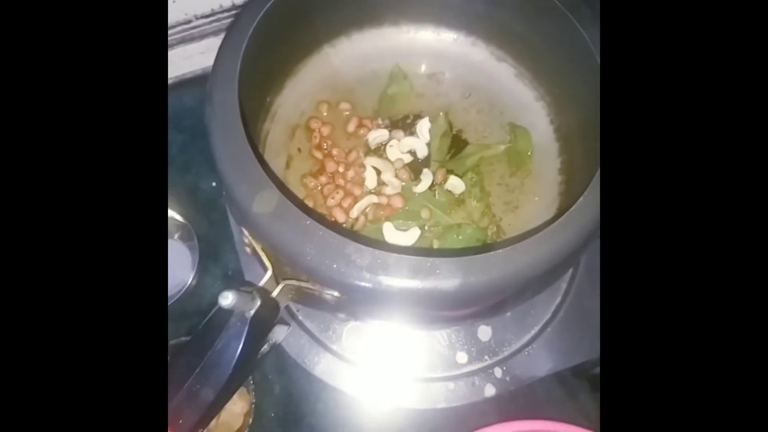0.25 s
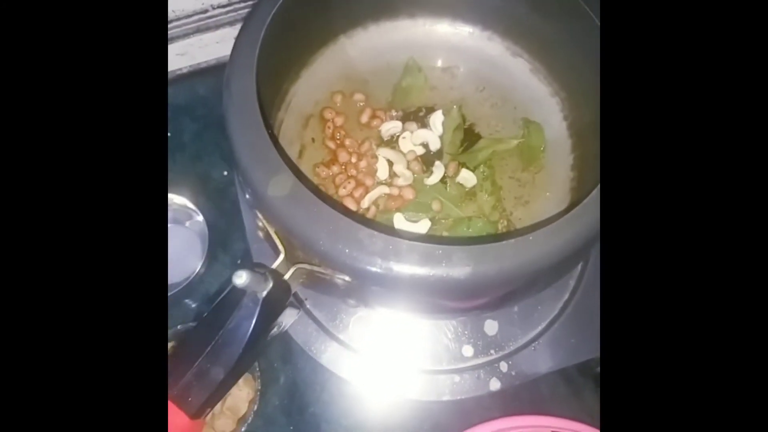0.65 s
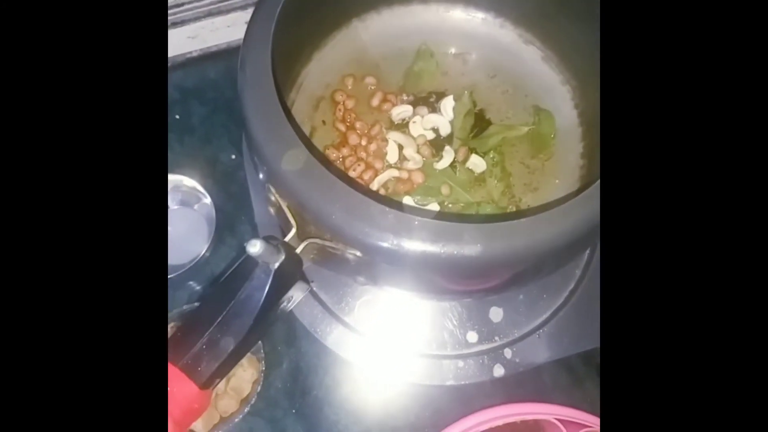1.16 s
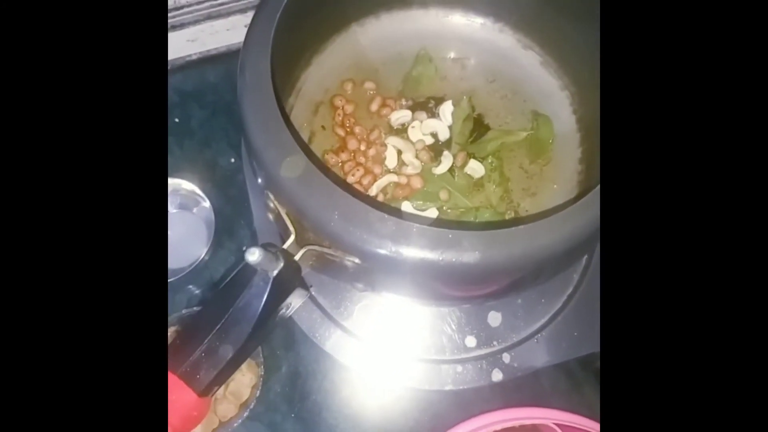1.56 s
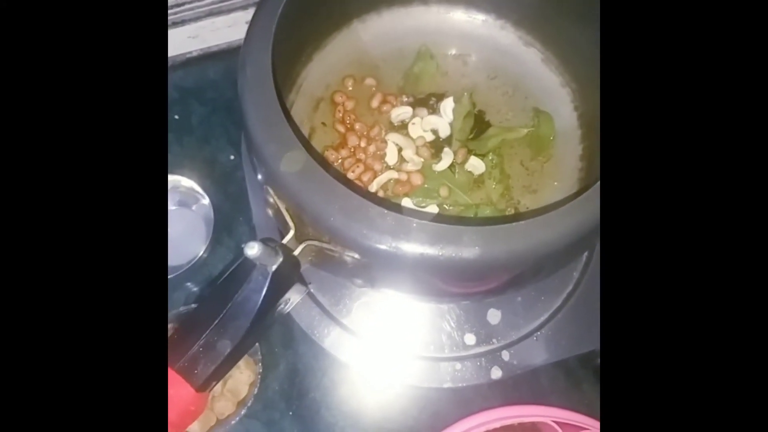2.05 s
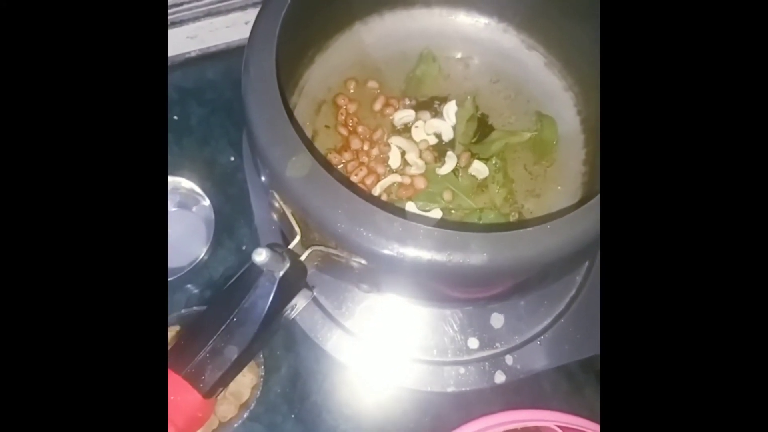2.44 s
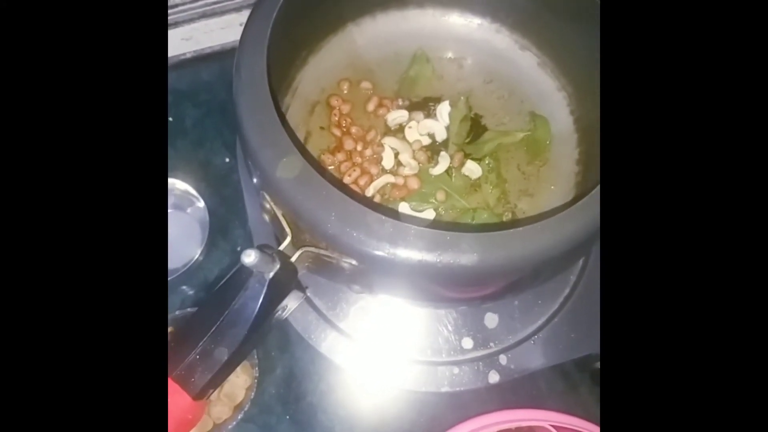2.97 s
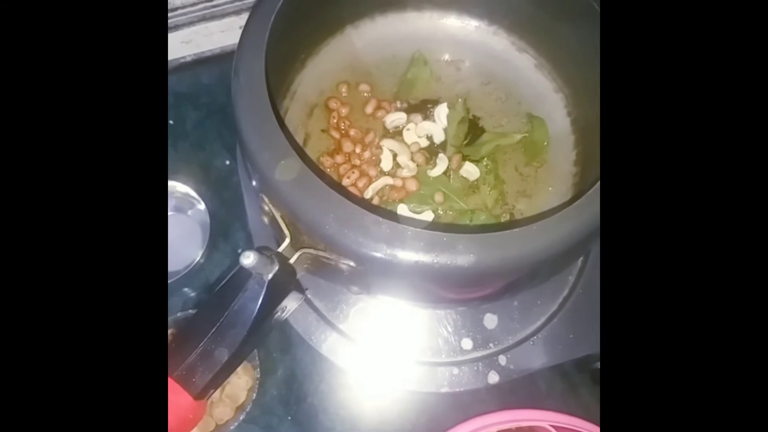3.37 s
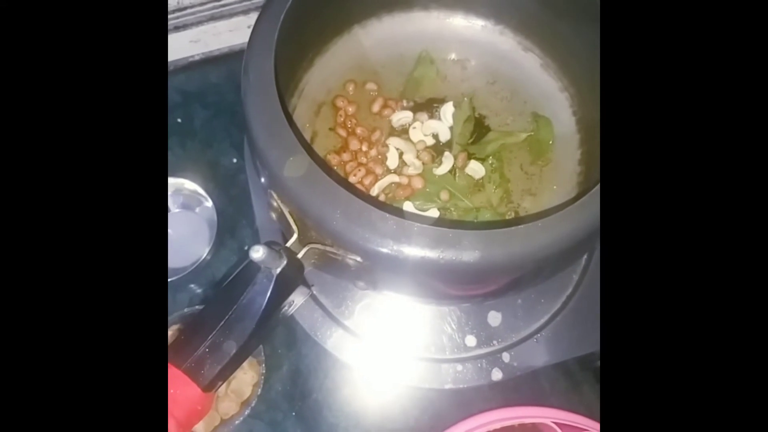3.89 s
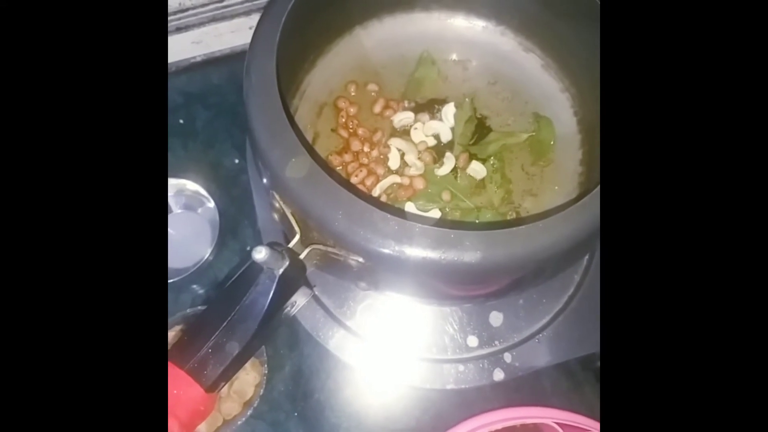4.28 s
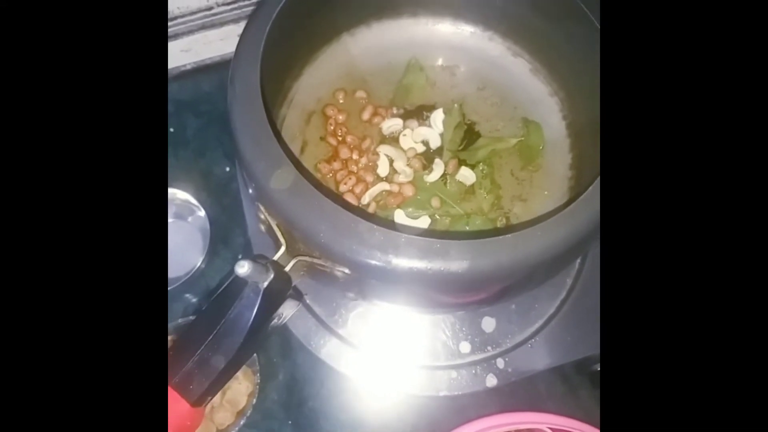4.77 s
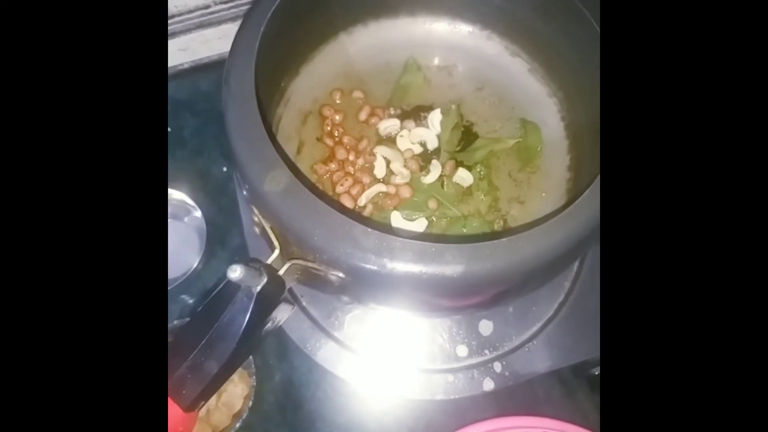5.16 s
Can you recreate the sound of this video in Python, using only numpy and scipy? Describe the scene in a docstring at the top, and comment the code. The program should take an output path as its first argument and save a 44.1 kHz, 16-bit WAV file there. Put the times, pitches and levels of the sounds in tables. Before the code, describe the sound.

A metallic clang, slightly left, opens the scene and is stopped in about 0.4 seconds. Steady, crisp frying hiss follows, with irregular pops, the strongest at roughly 0.8, 1.2, 2.6 and 4.1 seconds, some with short spitting bursts and dull knocks. Later the popping thins out. Close handheld stereo microphone above the pot, hard kitchen walls, very faint low flame underneath.

```python
"""A small hard kitchen: nuts and spices fry gently in an open pressure cooker on a gas stove, from just above the rim.
A steel utensil clangs as beating modes and is stilled by a hand. Dense random clicks, coloured, make the oil hiss;
larger steam bubbles pop as noise cracks with short gliding tones, which echo in the pot and the kitchen.
Coarser clicks spit and noise bands knock; filtered noise and faint tones make the low murmur of the burner."""
import sys
import numpy as np
from scipy import signal
from scipy.fft import rfft, irfft, next_fast_len
from scipy.io import wavfile
from scipy.ndimage import uniform_filter1d

SR = 44100
rng = np.random.default_rng(int(sys.argv[2]) if len(sys.argv) > 2 else 0)


def to_wav(sig):
    """Store sig (one row per channel, or 1-D mono) as 16-bit WAV at the path in sys.argv[1].

    Samples outside -1..1 are clipped; the rate is SR.
    """
    pcm = np.clip(np.atleast_2d(sig), -1, 1) * 32767
    pcm = np.round(pcm).astype(np.int16)
    wavfile.write(sys.argv[1], SR, pcm.T)  # frames by channels


N = 239154
T = np.arange(N) / SR


def undb(db):
    """Decibels to gain."""
    return 10 ** (np.asarray(db) / 20)


def unit(x):
    """Scale to an rms of one."""
    return x / np.sqrt(np.mean(x ** 2) + 1e-30)


def packet(x):
    """Scale to an energy of one."""
    return x / np.sqrt(np.sum(x ** 2) + 1e-30)


def fade(t, t60):
    """Silence before t = 0, then an exponential decay of 60 dB in t60 seconds."""
    return (t >= 0) * np.exp(-np.log(1000) * np.maximum(t, 0) / t60)


def colour(x, points, centre_hz=None, octaves=1):
    """Minimum-phase filter through (Hz, dB) points; optional hump, 6 dB down at +-octaves from its centre."""
    size = next_fast_len(len(x)) * 2
    log_f = np.log2(np.maximum(np.arange(size // 2 + 1) * SR / size, 1))
    hz, db = np.transpose(points)
    gain = undb(np.interp(log_f, np.log2(hz), db))
    if centre_hz:
        gain = gain / (1 + ((log_f - np.log2(centre_hz)) / octaves) ** 2)
    # folding the cepstrum makes the filter causal
    cepstrum = irfft(np.log(gain))
    cepstrum[1:size // 2] *= 2
    cepstrum[size // 2 + 1:] = 0
    response = np.exp(rfft(cepstrum))
    return irfft(rfft(x, size) * response)[:len(x)]


def resonate(x, hz, width_hz):
    """One resonance, gain one at its centre."""
    b, a = signal.iirpeak(min(hz, SR / 2 - 1000), hz / width_hz, fs=SR)
    return signal.lfilter(b, a, x)


def walk(rate_hz):
    """Smooth random wandering, rms one."""
    step = int(SR / rate_hz)
    held = np.repeat(rng.standard_normal(N // step + 1), step)
    return unit(uniform_filter1d(held, step)[:N])


def grains(rate_hz, spread_db):
    """Random tiny clicks of either sign, most weak and a few strong, rms one."""
    sizes = undb(spread_db * np.minimum(rng.exponential(size=N), 2 * np.pi))
    return unit((rng.random(N) < rate_hz / SR) * sizes * rng.choice([-1, 1], N))


def add(out, s, x):
    """Mix x into out from time s."""
    start = max(int(s * SR), 0)
    out[start:start + len(x)] += x[:max(N - start, 0)]


# Louder bursting droplets. Each row: start in seconds, level in dB, bubble pitch in Hz,
# bubble's share of the energy 0-1.
LOUD_POPS = [(.279, -39, 8600, 0), (.385, -35, 8440, 0.3), (0.432, -25.5, 10960, 0.63),
             (0.447, -33, 5740, 0.7), (.6517, -32, 7500, 0), (.75, -29.5, 8600, 0.35),
             (0.827, -31, 11360, 0.8), (0.8399, -13.5, 5320, .88), (1.1104, -34, 9000, 0.15),
             (1.1227, -33, 11800, 0.4), (1.135, -34, 5540, 0), (1.2075, -15.5, 12300, 0.04),
             (1.287, -34.5, 4320, 0.36), (1.4243, -39.5, 3900, 0.5), (1.5941, -30.5, 7130, 0.4),
             (1.648, -25, 7600, 0.77), (2.0059, -40.5, 7800, 0.66), (2.262, -35, 8340, .23),
             (2.325, -34.5, 8760, 0.2), (2.344, -28.5, 6200, 0), (2.5771, -14, 9600, 0.48),
             (2.61, -20.5, 3200, 0.01), (2.7622, -30.5, 10650, 0.82), (2.9905, -35.5, 5540, 0.7),
             (3.056, -30, 8870, 0.33), (3.1064, -41.5, 5300, 0.16), (3.176, -38, 7150, 0),
             (3.3053, -38.5, 8800, 0.7), (3.664, -24, 9470, 0.65), (3.8758, -31, 10200, 0.1),
             (4.104, -13, 5510, 0.76), (4.291, -34.5, 9800, 0.4), (4.35, -36, 8570, 0.03),
             (5.078, -37.5, 8000, 0.03)]
# How well a burst drives the pot's walls. Each row: frequency in Hz, gain in dB.
WALL_DRIVE = [(1260, 22), (2400, 16)]
POP_ROOM_DB = -8.5


def pops():
    """Droplets burst in the oil; the pot throws the sound into the kitchen and its walls ring."""
    near, far = np.zeros(N), np.zeros(N)
    for s, db, bubble_hz, share in list(LOUD_POPS) + faint_pops():
        direct, thrown = droplet(db, bubble_hz, share)
        add(near, s, direct)
        add(far, s, undb(POP_ROOM_DB) * thrown)
    return near + kitchen(far) + pot_walls(colour(far, WALL_DRIVE))


# Colour of a burst leaving the pot. Each row: frequency in Hz, relative level in dB.
BURST_COLOUR = [(100, -13), (900, -17.5), (2000, -15.5), (3400, -15), (4100, -3.5), (5300, 0.5),
                (6800, -6.5), (8800, -0.5), (10100, -7.5), (11300, -1.5), (13500, -6.5), (16000, -18)]
# usual bubble pitch, and octaves of crack per octave of bubble
DROPLET_HZ, CRACK_FOLLOWS = 8570, 0.7
# weaker droplets burst faster: duration halves every HALVING_DB below a full pop
FULL_POP_DB, HALVING_DB = -13, 34.5
CRACK_T60_S, POT_T60_S, BUBBLE_S = 0.017, 0.039, 0.0033  # crack and bubble times are for a full pop
POT_ECHO_DB, BUBBLE_ROOM_DB = -8, -4.5


def droplet(db, bubble_hz, share, glide=0.21, smear=0.29, size=2048):
    """A crack and a bubble tone of rising pitch: the direct sound, and what the pot throws out."""
    t = T[:size]
    noise = rng.standard_normal((3, size))
    length = 2 ** ((db - FULL_POP_DB) / HALVING_DB)
    crack_hz = DROPLET_HZ * (bubble_hz / DROPLET_HZ) ** CRACK_FOLLOWS

    def burst(n, t60):
        shaped = colour(n * fade(t, t60), BURST_COLOUR, crack_hz, octaves=0.78)
        return np.sqrt(1 - share) * packet(shaped)

    # the crack arrives once straight, and again smeared by bouncing round the pot
    crack = burst(noise[0], CRACK_T60_S * length)
    echoes = burst(noise[1], POT_T60_S)

    life = np.minimum(t / (BUBBLE_S * length), 1)
    pitch_hz = bubble_hz * (1 + glide * (life - .58))
    tone = np.sin(np.pi * life) * np.sin(2 * np.pi * np.cumsum(pitch_hz) / SR)
    bubble = np.sqrt(share) * packet(tone)

    width_hz = smear * bubble_hz
    smeared = resonate(noise[2] * fade(t, POT_T60_S), bubble_hz, width_hz)
    bubble_echoes = np.sqrt(share) * packet(resonate(smeared, bubble_hz, width_hz))

    gain = undb(db) * np.sqrt(.005 * SR)  # level as rms over 5 ms
    direct = packet(crack + bubble) + undb(POT_ECHO_DB) * echoes
    thrown = echoes + undb(BUBBLE_ROOM_DB) * bubble_echoes
    return gain * direct, gain * thrown


FAINT_PER_S, FAINT_DB, FAINT_OCTAVES, FAINT_SHARE = 6, -43, 0.2, .2  # pitch spreads +-octaves


def faint_pops():
    """Small droplets burst at random moments: rows like those of LOUD_POPS."""
    chance = rng.random((int(FAINT_PER_S * N / SR), 2))
    return [(when * N / SR, FAINT_DB, DROPLET_HZ * 2 ** (FAINT_OCTAVES * (2 * pitch - 1)), FAINT_SHARE)
            for when, pitch in chance]


# Strength of the frying. Each row: time in seconds, level in dB before stirring and flicker.
SIZZLE_LEVEL = [(0.2, -45.5), (1.36, -44.5), (1.96, -48.5), (2.61, -46.5), (3.35, -48), (4.24, -46),
                (4.47, -48), (5.42, -48)]
# Colour of the hiss. Each row: frequency in Hz, relative level in dB.
HISS_COLOUR = [(900, -33), (3500, -24), (3850, -6.5), (4600, 1), (5400, 1), (6200, -3), (7500, -1),
               (8700, 2), (10100, -4.5), (11300, -2), (13500, -4.5), (15500, -12)]
STIR_HISS_DB = -0.5  # change of hiss in fully stirred oil
WALLS_CALM_DB, WALLS_STIRRED_DB = -83.5, -70  # the stirred part adds to the calm one


def sizzle():
    """Thousands of tiny bubbles a second merge into a hiss with sparse ticks, and shake the walls."""
    stirred = stir()
    fizz = grains(rate_hz=8300, spread_db=1.5)
    tick = packet(rng.standard_normal(256) * fade(T[:256], .007))
    ticks = np.convolve(grains(rate_hz=60, spread_db=2), tick)[:N]
    level_db = np.interp(T, *np.transpose(SIZZLE_LEVEL)) + STIR_HISS_DB * stirred + 0.35 * walk(19)
    hiss = unit(colour(fizz + undb(-16) * ticks, HISS_COLOUR)) * undb(level_db)
    shaking = undb(WALLS_CALM_DB) + undb(WALLS_STIRRED_DB) * stirred
    walls = unit(pot_walls(fizz)) * shaking * undb(2.2 * walk(13.0))
    return hiss + walls


STIR_T60_S = 0.47


def stir():
    """How stirred the oil is, 0-1: it jumps with each louder pop and settles."""
    return np.max([fade(T - s, STIR_T60_S) for s, *_ in LOUD_POPS], axis=0)


# Short fits of spitting. Each row: start in seconds, time to the peak in seconds, level in dB, centre in Hz.
SPITS = [(.39, 0.02, -51.5, 5300), (1.2075, 0.017, -41, 13100), (1.225, 0.07, -53.5, 3670),
         (1.385, 0.028, -47, 4860), (2.335, 0.013, -59.5, 3060), (2.606, 0.021, -44, 4040)]


def spits():
    """A wet spot boils off in a swarm of coarser bubbles that swells quickly, shakes the walls and dies away."""
    out = np.zeros(N)
    for s, rise_s, db, hz in SPITS:
        age = np.maximum(T - s, 0) / rise_s
        bubbles = grains(rate_hz=1000, spread_db=3.5)
        swarm = unit(colour(bubbles, [(600, -28), (2200, -2.5), (3400, -4.0)], hz, octaves=0.36))
        out += undb(db) * swarm * age * np.exp(1 - age)
    return out + kitchen(out) + undb(8) * pot_walls(out)


# Modes of the steel utensil. Each row: frequency in Hz, level in dB before the grip, t60 in seconds,
# beat rate in Hz, beat depth -1..1 (negative swells first).
STEEL_MODES = [(1451, -37.5, .25, 6.6, 0.36), (1697, -28.5, 0.076, 14, .3), (1850, -41, .25, 13, 0.02),
               (1974, -36.5, 0.33, 51, .3), (1892, -52, 0.41, 16, .4), (2015, -43, 0.3, 7.6, 0.67),
               (2031, -21.5, .8, 21.5, .35), (3704, -33, .7, 21, .35), (5798, -31, .6, 18, -.65),
               (8390, -35, .5, 13, .5), (3650, -35.5, 0.49, 4.5, .3), (9860, -36, 0.22, 24, 0.37),
               (12800, -39, .2, 15, 0.24)]
# A hand closes on the steel in two steps. Each row: time in seconds, gain of the ring in dB.
GRIP = [(0, 1), (.152, 2.5), (.188, -9), (.35, -10), (.39, -26)]
# Utensil hits the pot. Each row: time in seconds, relative level in dB.
CONTACTS = [(0, -21), (.042, -43), (0.081, -39.5)]
# Colour of that clatter. Each row: frequency in Hz, relative level in dB.
CLATTER_COLOUR = [(40, -58), (110, -29.5), (175, -10.5), (240, -29), (600, -22), (1100, -20), (1600, -8.5),
                  (2000, 6), (2300, -14.5), (3200, -15.5), (5000, -23), (9000, -33.5), (15000, -29)]
STEEL_ATTACK_S, CLATTER_T60_S, CLATTER_GAIN_DB, CLATTER_ROOM_DB = 0.00061, 0.44, 12, -14.5


def utensil():
    """Steel strikes the pot and rattles; its modes beat until a hand stills them."""
    ring = np.zeros(N)
    for hz, db, t60, beat_hz, depth in STEEL_MODES:
        beating = 1 + depth * np.cos(2 * np.pi * beat_hz * T)
        ring += undb(db) * fade(T, t60) * beating * np.sin(2 * np.pi * hz * T)
    ring = ring * undb(np.interp(T, *np.transpose(GRIP)))
    ring = ring * (1 - np.exp(-T / STEEL_ATTACK_S))
    blows = np.sqrt(sum((undb(db) * fade(T - s, CLATTER_T60_S)) ** 2 for s, db in CONTACTS))
    clatter = colour(blows * rng.standard_normal(N), CLATTER_COLOUR) * undb(CLATTER_GAIN_DB)
    return ring + clatter + undb(CLATTER_ROOM_DB) * kitchen(clatter)


# Knocks from bumps on the stove top, and short broad low thumps heard with the strongest pops. Each row: start
# in seconds, level in dB, centre in Hz, half-width in octaves, t60 in seconds.
KNOCKS = [(0.277, -64, 180, 0.41, 0.46), (0.8411, -58, 1410, 0.46, 0.1), (1.208, -41.5, 740, 1.6, 0.012),
          (2.578, -42.5, 750, 1.3, 0.015), (2.611, -46.5, 1560, 0.44, 0.1), (4.352, -70, 2300, 0.36, .2),
          (4.657, -64.5, 1380, 2.8, 0.86), (5.324, -64, 438, 0.59, 0.48)]


def knocks():
    """Dull bumps, each a decaying hump of noise that also sets the walls ringing."""
    out = np.zeros(N)
    for s, db, hz, octaves, t60 in KNOCKS:
        body = unit(colour(rng.standard_normal(N), [(50, -20), (200, -15)], hz, octaves=octaves))
        out += undb(db) * fade(T - s, t60) * body
    return out + undb(12.5) * pot_walls(out)


# Colour of the burner and kitchen. Each row: frequency in Hz, relative level in dB.
BURNER_COLOUR = [(25, -24.5), (50, -13.5), (78, 2.5), (110, 6), (150, -3.5), (185, -7.5), (230, -11),
                 (600, -16), (1200, -23.5), (3000, -17.5)]
# Their tones. Each row: frequency in Hz, mean level in dB.
HUM = [(78, -80), (120, -73.5), (181, -82)]
BURNER_DB = -67.5


def burner():
    """The flame murmurs unevenly as filtered noise beside a faint wavering hum."""
    out = unit(colour(rng.standard_normal(N), BURNER_COLOUR)) * undb(BURNER_DB + 0.77 * walk(4.6))
    for hz, db in HUM:
        tone = np.sin(2 * np.pi * hz * T + 0.5 * walk(12))
        out += undb(db + 2 * walk(2.3)) * np.sqrt(2) * tone
    return out


# Wall modes of the pot. Each row: frequency in Hz, width in Hz, gain in dB.
POT_MODES = [(1255, 50, -19), (1924, 31, -14), (2345, 38, -3), (2970, 83, -10)]


def pot_walls(x):
    """The thin walls ring at their modes with whatever drives them."""
    return sum(undb(db) * resonate(x, hz, width_hz) for hz, width_hz, db in POT_MODES)


ROOM_T60_S, ROOM_TOP_T60_S, ROOM_SPLIT_HZ, ROOM_BUILD_S = 0.45, 0.28, 9000, 0.00067


def kitchen(x):
    """Dense reflections from hard walls, as decaying noise; the top dies sooner."""
    t = T[:N // 4]

    def band(kind):
        sos = signal.butter(2, ROOM_SPLIT_HZ, kind, fs=SR, output="sos")
        return signal.sosfilt(sos, rng.standard_normal(len(t)))

    tail = band("low") * fade(t, ROOM_T60_S) + band("high") * fade(t, ROOM_TOP_T60_S)
    tail = tail * (1 - np.exp(-t / ROOM_BUILD_S))
    return signal.fftconvolve(x, packet(tail))[:N]


def place(x, left_db):
    """Set a source to one side; the level differs between the ears mainly in the midrange."""
    middle = resonate(x, 1900, 750)
    return x + middle * (undb(np.array([[left_db], [-left_db]]) / 2) - 1)


UTENSIL_LEFT_DB = 3.3  # left over right


def scene():
    """The pot in the middle, the utensil a little to the left."""
    return pops() + sizzle() + spits() + burner() + knocks() + place(utensil(), UTENSIL_LEFT_DB)


# right microphone port's resonance, as level over the left
PORT_HZ, PORT_WIDTH_HZ, PORT_RIGHT_DB = 9900, 600, 4.6
TOP_HZ = 15750


def record(dry):
    """Two microphone ports, the right slightly brighter; deep bass cut, full-scale clipping, then top cut."""
    both = signal.sosfilt(signal.butter(2, 20, "high", fs=SR, output="sos"), dry)
    port_gain = undb(np.array([[-PORT_RIGHT_DB], [PORT_RIGHT_DB]]) / 2)
    both = both + resonate(both, PORT_HZ, PORT_WIDTH_HZ) * (port_gain - 1)
    top_cut = signal.ellip(10, .2, 70, TOP_HZ, fs=SR, output="sos")
    return signal.sosfilt(top_cut, np.clip(both, -1, 1))


dry = scene()
out = record(dry)
to_wav(out)
```